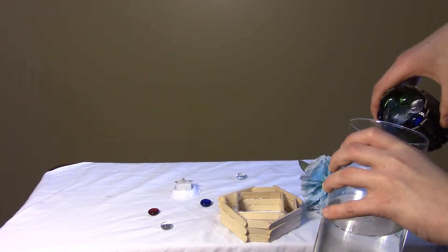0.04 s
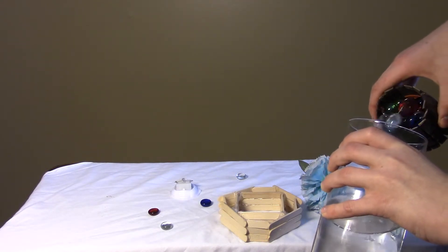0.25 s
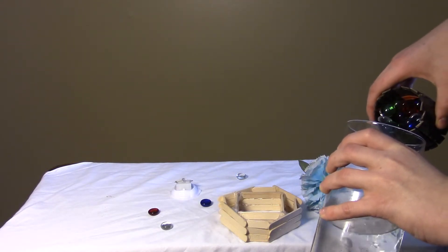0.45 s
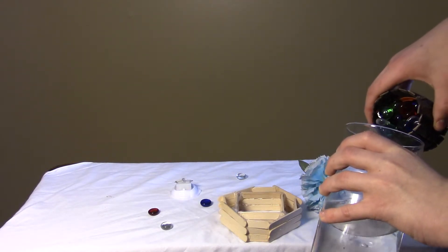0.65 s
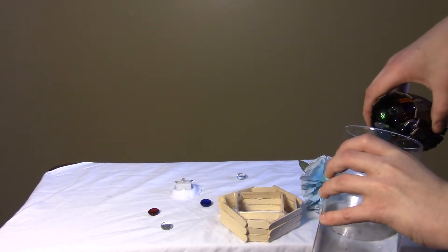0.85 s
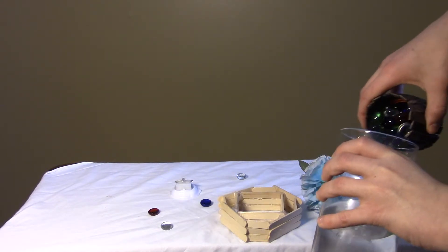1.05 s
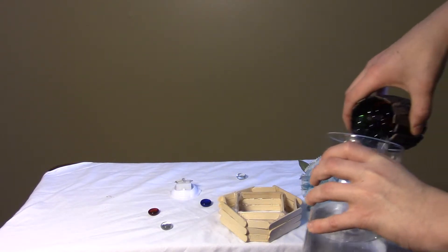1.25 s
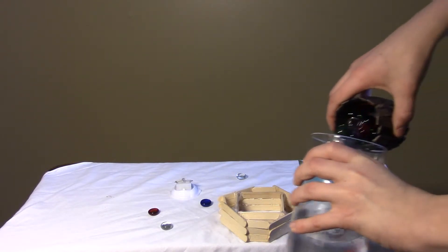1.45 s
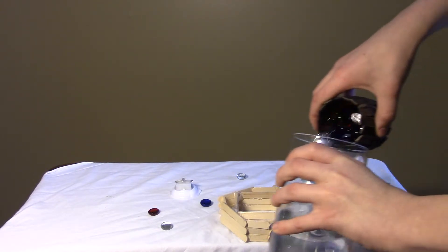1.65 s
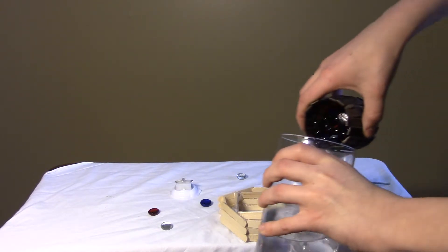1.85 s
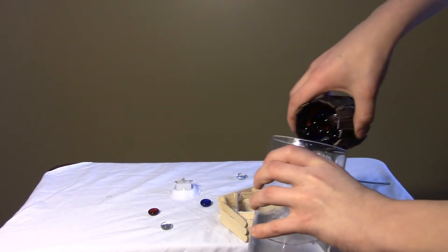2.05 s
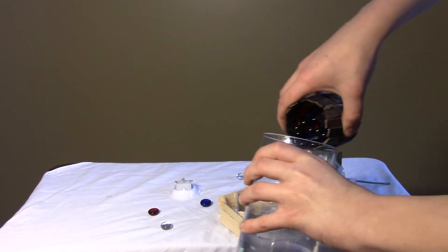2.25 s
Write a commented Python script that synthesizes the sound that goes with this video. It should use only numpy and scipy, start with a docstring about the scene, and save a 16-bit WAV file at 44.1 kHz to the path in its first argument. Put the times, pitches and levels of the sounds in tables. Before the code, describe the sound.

Glass pebbles clink and rattle as they slide from a glass bowl into a jar of water, making small plops and splashes. Two pours come with a brief pause between, heard close up in a small, quiet room.

```python
"""Dry ticks and a rising rattle come first, over the faint hush and mains hum of a small room: glass pebbles
slide out of a glass bowl, in two pours, into a jar of water on a table. Each impact cracks and excites
the normal modes of the glass, which ring as a clink. The pebbles slap the water and pull bubbles under;
these oscillate as gliding plops and drive the resonances of the air in the jar.
The room adds a short reverberation, and a close microphone rounds the loudest clinks."""
import sys
import numpy as np
from scipy import signal
from scipy.fft import rfft, irfft
from scipy.io import wavfile

SR = 44100
rng = np.random.default_rng(int(sys.argv[2]) if len(sys.argv) > 2 else 0)


def transcribe(signal):
    """Save signal, clipped to [-1, 1], as a 16-bit WAV file at the path in sys.argv[1]."""
    frames = np.atleast_2d(signal).T
    limited = np.clip(frames, -1, 1)
    pcm = np.round(limited * 32767).astype(np.int16)
    wavfile.write(sys.argv[1], SR, pcm)


N = 105840

# air noise of the room, common to both sides and opposed between them (frequency [Hz], level [dB])
HUSH_SPECTRUM = [(18, -56.5), (85, -24), (125, -5), (415, -3.5), (684, -5), (1320, -15), (2120, -19),
                 (16000, -45)]
SIDE_HUSH_SPECTRUM = [(150, -2), (16000, -32)]
# pebbles shifting in the bowl (time [s], level [dB])
SHIFT_TICKS = [(.1, -31), (.1635, -19.5), (.2224, -31.5), (1.026, -34), (1.1812, -32.5), (1.2406, -29),
               (1.2614, -25)]
# the short crack of contact (frequency [Hz], level [dB])
CRACK_SPECTRUM = [(100, -46), (600, -39), (1500, -13.5), (3200, -12), (4500, -6.5), (7000, -2), (9000, 5),
                  (10500, -1), (13000, -2.5), (16000, -16.5)]
# envelope of the rattle of sliding pebbles (time [s], level [dB])
SLIDE_LEVEL = [(0, -78), (.16, -21.5), (.24, -14.5), (.31, -4), (.42, -1.5), (.51, 2), (.55, -9.5),
               (.61, -8), (.84, -12), (.97, -57), (1.22, -38.5), (1.41, -15), (1.52, -8.5), (1.61, -18.5),
               (1.74, 0), (1.81, -6), (1.90, 0.5), (1.97, -15.5), (2.06, -5.5), (2.16, -16.5), (2.2, -13.5),
               (2.3, -20)]
# normal modes of the glass (frequency [Hz], level [dB], t60 [s])
GLASS_MODES = [(1677, -20, 0.05), (1906, -20, 0.097), (2838, -9.5, 0.063), (3747, -6, 0.054),
               (4320, -2, 0.045), (4560, -10.5, 0.18), (4720, -13.5, 0.14), (5570, 1, .062),
               (6695, -1, .055), (7540, 3, .05), (5860, -13, 0.026), (6210, -2.5, 0.028),
               (7280, -6.5, 0.027), (7624, 10, 0.0094), (8480, 0.5, 0.022), (8750, 8, 0.021),
               (8800, -3, 0.05), (9260, 1.5, 0.035), (10760, -8.5, 0.0079), (11700, -10, 0.023)]
# dull bumps of the bowl on the rim of the jar (time [s], level [dB])
RIM_BUMPS = [(.1497, -27), (1.4009, -26)]
# spectrum of a bump (frequency [Hz], level [dB])
BUMP_SPECTRUM = [(1000, -10), (3000, 2.5), (16000, -20.5)]
# knocks of pebbles on glass (time [s], level [dB], extra ring of the low modes [dB])
KNOCKS = [(0.2492, -4.5, 4), (0.2809, -7.5, 6.5), (0.3027, -10.5, 0.5), (0.3189, -8, 3), (0.342, -6.5, 1.5),
          (0.361, -9, -1), (0.3783, -13, 7), (0.3882, -16, -3.5), (0.3965, -8.5, 2), (0.4031, -7.5, -7),
          (0.4164, -17.5, 0), (0.4441, -12, 4), (0.4574, -14, 3), (0.4691, -6.5, 5.5), (0.4863, -13.5, 2),
          (0.514, -18, 10), (0.547, -10, -7), (0.558, -9.5, -6), (0.576, -15.5, -3), (0.627, -3.5, -1.5),
          (0.655, -7.5, -6), (0.6706, -14, 0.5), (0.7225, -10, -9), (0.7578, -22.5, 2), (0.768, -44, -20),
          (0.8243, -20.5, 1), (0.8665, -25.5, 1), (0.8976, -28.5, -2.5), (1.281, -5, -10),
          (1.2844, -21, 10.5), (1.2986, -14.5, 7), (1.4432, -5, 4), (1.5182, -4.5, 0.5),
          (1.5348, -12.5, -5), (1.546, -14.5, -1), (1.5795, -19, 1), (1.6245, -4, -2), (1.6362, -11.5, 5.5),
          (1.6859, -8, 3), (1.7144, -16.5, 4.5), (1.7355, -12.5, 4), (1.7501, -3.5, -7.5), (1.77, -13, 4),
          (1.818, -20, 0), (1.822, -5.5, 0), (1.8356, -8.5, 6), (1.8616, -6, -1), (1.9142, -3.5, -6),
          (1.931, -16.5, 3), (1.9883, -10.5, -2), (1.997, -8.5, -7), (2.034, -10, -7), (2.05, -8, -0.5),
          (2.1087, -21, -3), (2.1426, -18.5, 3.5), (2.1843, -22, -12), (2.1933, -24, 3),
          (2.2098, -22.5, -5), (2.333, -38.5, 7.5)]
# bubbles pulled under by the pebbles (time [s], pitch [Hz], level [dB], t60 [s], rise [octaves/s])
LARGE_BUBBLES = [(.2925, 594, -17, 0.069, 4), (.304, 603.6, -23, 0.23, 6), (.312, 703, -9.5, 0.033, 11),
                 (.374, 668, -17.5, 0.073, 10), (.474, 639, -29.5, 0.48, 3.2),
                 (0.479, 392.4, -26.5, 0.16, 2.5), (.552, 588, -17, 0.046, 16),
                 (.562, 477, -24, 0.084, 5.5), (.68, 658.4, -37, 0.83, 1.34), (1.283, 362, -33, 0.41, 5.5),
                 (1.284, 658, -35.5, 0.63, -1), (1.326, 730, -30, 0.2, 4.1), (1.497, 567, -7, 0.053, -22.5),
                 (1.506, 792, -14.5, 0.02, 66), (1.658, 1410, -9, 0.01, 3), (1.659, 472, -14.5, 0.12, 3.5),
                 (1.701, 623, -24.5, 0.16, 9), (1.729, 694, -18.5, 0.086, 2.5),
                 (1.884, 356.5, -26, 0.14, 6.5), (1.892, 713, -25, 0.13, 11), (1.912, 955, -25, 0.095, 7.5),
                 (2.068, 980, -13.5, 0.0064, 27)]
# a pebble's slap on the water (frequency [Hz], level [dB])
SLAP_SPECTRUM = [(220, -24), (600, 13), (6000, -29)]
# envelope of the splashing (time [s], level [dB])
SPLASH_LEVEL = [(.27, -2), (.33, 10.5), (.6, 2), (1.1, -9.5), (1.3, -1.5), (1.68, 6), (1.84, 7),
                (1.915, 20.5), (1.98, 7.5), (2.4, -1)]
# resonances of the air in the jar (frequency [Hz], gain [dB])
JAR_MODES = [(440, 3.5), (690, 2.5)]
# reverberation time of the room (frequency [Hz], t60 [s])
ROOM_DECAY = [(800, 0.35), (5500, 0.16), (14000, 0.057)]


def undb(db):
    """Decibels to amplitude ratio."""
    return 10 ** (np.asarray(db) / 20)


def fade(t, t60):
    """Exponential damping: the amplitude falls 60 dB in t60 seconds."""
    return np.exp(-np.log(1000) * t / t60)


def curve(table, t):
    """Linear interpolation between the rows of a table."""
    return np.interp(t, *np.array(table).T)


def add(out, start, x):
    """Superposition: x joins the mix at a start time in seconds."""
    i = int(np.clip(start * SR, 0, N - 1))
    out[i:i + len(x)] += x[:N - i]


def colour(x, spectrum, size=4096):
    """A minimum-phase filter of unit power imposes a spectrum causally."""
    hz, db = np.array(spectrum, float).T
    bin_hz = np.arange(size // 2 + 1) * SR / size
    gain = undb(np.interp(np.log(bin_hz + 1), np.log(hz), db))
    cepstrum = irfft(np.log(gain))
    cepstrum[1:size // 2] *= 2
    cepstrum[size // 2 + 1:] = 0
    response = irfft(np.exp(rfft(cepstrum)))
    return signal.fftconvolve(x, response / np.linalg.norm(response))[:N]


def mode(x, hz, t60):
    """A damped harmonic oscillator, driven by x; a unit impulse gives unit amplitude."""
    pole = np.exp(2j * np.pi * hz / SR) * fade(1 / SR, t60)
    return signal.lfilter([1], [1, -pole], x).imag


def hush(spectrum, rms_db):
    """Stationary broadband noise from the air of the room."""
    return undb(rms_db) * colour(rng.standard_normal(N), spectrum)


def mains_hum(hz=120.2, rms_db=-64):
    """A pure tone at twice the mains frequency."""
    return undb(rms_db) * np.sqrt(2) * np.sin(2 * np.pi * hz * np.arange(N) / SR)


def taps(events, spectrum, t60):
    """Heavily damped impacts give bursts of noise with no ring."""
    envelope, t = np.zeros(N), np.arange(SR // 10) / SR
    for start, db in events:
        add(envelope, start, undb(db) * fade(t, t60))
    return colour(envelope * rng.standard_normal(N), spectrum)


def rattle(touches_per_s=420, spread_db=2.5, crowded_db=-7, ring_db=-37, crack_db=-22):
    """Random impulses from sliding pebbles excite the glass modes, thinning out as the heap settles."""
    count = int(touches_per_s * N / SR)
    jitter, size, chance = rng.random((count, 3)).T
    at = ((np.arange(count) + jitter) * N / count).astype(int)
    level = curve(SLIDE_LEVEL, at / SR)
    moving_share = np.clip(undb(level - crowded_db), .15, 1)
    strength = undb(level + spread_db * (2 * size - 1)) / np.sqrt(moving_share)
    touches = np.zeros(N)
    touches[at] = (chance < moving_share) * strength
    ring = sum(undb(db) * mode(touches * rng.uniform(-2, 2, N), hz, t60) for hz, db, t60 in GLASS_MODES)
    contact = signal.lfilter([1], [1, -fade(1 / SR, t60=0.0085)], touches)
    crack = colour(contact * rng.standard_normal(N), CRACK_SPECTRUM)
    return undb(ring_db) * ring + undb(crack_db) * crack


def clinks(contact_s=0.00024, ring_db=-10, scatter_db=6.5, detune=.014, low_hz=5760, high_hz=8530):
    """Modal excitation: each knock cracks, chatters and shares its energy unevenly among the modes."""
    t = np.arange(SR // 5) / SR
    hz, db, t60 = np.array(GLASS_MODES, float).T
    ring, contact = np.zeros(N), np.zeros(N)
    onset = 1 - np.exp(-t / contact_s)
    decays = onset * fade(t, t60[:, None])
    crack = undb(-.5) * fade(t, t60=0.0049)
    chatter = undb(-10.5) * fade(t, t60=0.081)
    grit = rng.standard_normal(N)
    for start, level, low_db in KNOCKS:
        size, sign, mistuning = rng.standard_normal((3, len(hz)))
        usual = undb(level + db + np.interp(hz, [low_hz, high_hz], [low_db, 0]))
        gain = np.sign(sign) * usual * undb(scatter_db * np.clip(size, -1, 1))
        gain *= np.linalg.norm(usual) / np.linalg.norm(gain)  # scatter keeps the summed power
        phase = np.outer(2 * np.pi * hz * (1 + detune * mistuning), t)
        add(ring, start, gain @ (decays * np.sin(phase)))
        add(contact, start, undb(level) * onset * (crack + chatter))
    return undb(ring_db) * ring + colour(contact * grit, CRACK_SPECTRUM)


def pebble_tones(count=5, low_hz=4174, high_hz=10320, gain_db=-9):
    """Free vibration of the colliding pebbles adds short high tones, new at every knock."""
    out, t = np.zeros(N), np.arange(SR // 10) / SR
    polarity = (-1) ** np.arange(count)
    for start, level, _ in KNOCKS:
        hz = np.sort(rng.uniform(low_hz, high_hz, count))
        tones = polarity @ np.sin(2 * np.pi * np.outer(hz, t))
        add(out, start, undb(level + gain_db) * tones * fade(t, t60=0.021))
    return out


def bubble(hz, t60, octaves_per_s, waver_depth=.05, waver_hz=42, swell_s=0.0016):
    """A bubble is a damped oscillator whose pitch glides and wavers as it moves under the surface."""
    t = np.arange(int(t60 * SR)) / SR
    waver = 1 + waver_depth * np.sin(2 * np.pi * (waver_hz * t + rng.random()))
    pitch = hz * 2 ** (octaves_per_s * t) * waver
    envelope = fade(t, t60) * (1 - np.exp(-t / swell_s))
    return np.sin(2 * np.pi * np.cumsum(pitch) / SR) * envelope


def plops(slap_db=-9.5):
    """Air entrainment: a pebble slaps the surface and pulls a large bubble under."""
    tones, slaps, t = np.zeros(N), np.zeros(N), np.arange(SR // 10) / SR
    for start, hz, db, t60, rise in LARGE_BUBBLES:
        add(tones, start, undb(db) * bubble(hz, t60, rise))
        add(slaps, start, undb(db + slap_db) * fade(t, t60=0.0094))
    return tones + colour(slaps * rng.standard_normal(N), SLAP_SPECTRUM)


def spray(bubbles_per_s=630, low_hz=565, high_hz=2330, decay_cycles=28.2):
    """Splashing makes small bubbles of equal quality factor, so the higher ones die sooner."""
    out = np.zeros(N)
    for when, pitch, size in rng.random((int(bubbles_per_s * N / SR), 3)):
        start = when * N / SR
        hz = low_hz * (high_hz / low_hz) ** pitch
        db = curve(SPLASH_LEVEL, start) - 53 + 10 * size
        add(out, start, undb(db) * bubble(hz, decay_cycles / hz, octaves_per_s=28))
    return out


def jar_air(water, t60=.38):
    """Cavity resonance: the sound of the water drives the air in the jar."""
    unity_gain = 2 * (1 - fade(1 / SR, t60))  # cancels the oscillator's gain at resonance
    return sum(undb(db) * unity_gain * mode(water, hz, t60) for hz, db in JAR_MODES)


def reverberation(x, onset_s=0.013):
    """The diffuse field of a small room builds up and decays; the treble is absorbed first."""
    t = np.arange(SR) / SR
    noise = rfft(rng.standard_normal(SR))
    hz, t60s = np.array(ROOM_DECAY).T
    bands = [np.interp(np.arange(len(noise)), hz, weights) for weights in np.eye(len(hz))]
    response = sum(irfft(noise * band) * fade(t, t60) for band, t60 in zip(bands, t60s))
    response *= 1 - np.exp(-t / onset_s)
    return signal.fftconvolve(x, response / np.linalg.norm(response))[:N]


def scene(bass_cut_hz=400, room_db=-10, water_reverb_db=-6, reflection_s=0.0018, reflection_db=-18.5):
    """Glass, water and room superpose near the centre; a near reflection reaches the sides unequally."""
    ticks = taps(SHIFT_TICKS, CRACK_SPECTRUM, t60=0.01)
    bumps = taps(RIM_BUMPS, BUMP_SPECTRUM, t60=0.032)
    glass = ticks + rattle() + bumps + clinks() + pebble_tones()
    radiation = signal.butter(1, bass_cut_hz, "high", fs=SR, output="sos")
    glass = signal.sosfilt(radiation, glass)  # small glass radiates little bass
    water = plops() + spray()
    water += jar_air(water)
    # the plops and splashes get less reverberation than the clinks
    echoes = undb(room_db) * reverberation(glass + undb(water_reverb_db) * water)
    mid = glass + water + echoes + hush(HUSH_SPECTRUM, rms_db=-48) + mains_hum()
    side = hush(SIDE_HUSH_SPECTRUM, rms_db=-63.5)
    add(side, reflection_s, undb(reflection_db) * np.gradient(glass))
    return np.array([mid + side, mid - side])


def record(dry, drive_db=1, knee=3.3, top_hz=16000):
    """Soft saturation in the microphone rounds the loudest peaks; a low-pass filter cuts the top."""
    driven = dry * undb(drive_db)
    rounded = driven / (1 + np.abs(driven) ** knee) ** (1 / knee)
    return signal.sosfilt(signal.ellip(10, .2, 70, top_hz, fs=SR, output="sos"), rounded)


dry = scene()
out = record(dry)
transcribe(out)
```